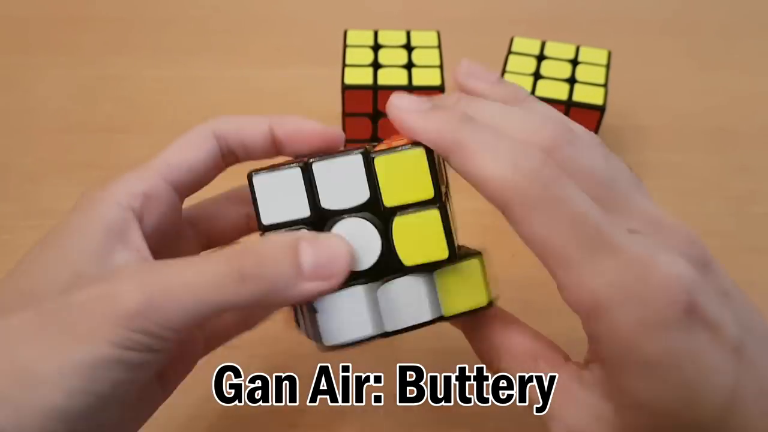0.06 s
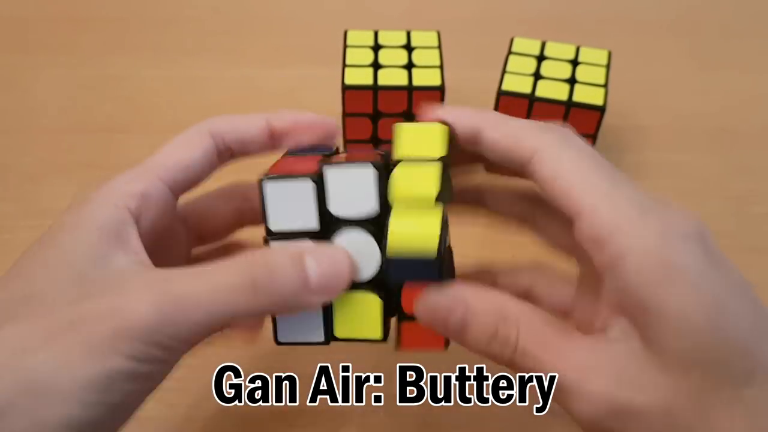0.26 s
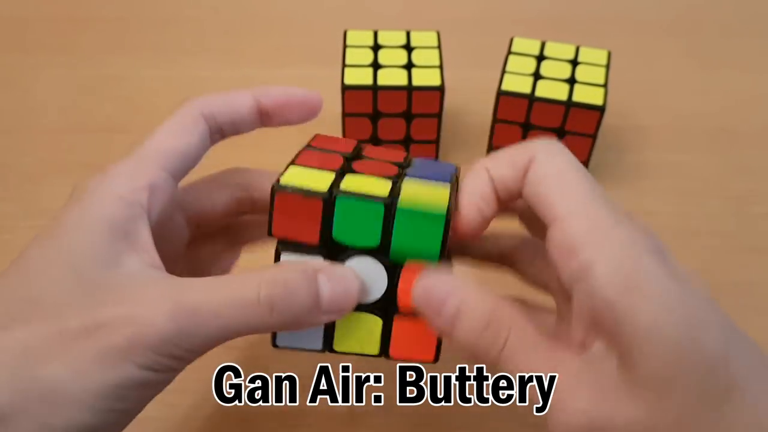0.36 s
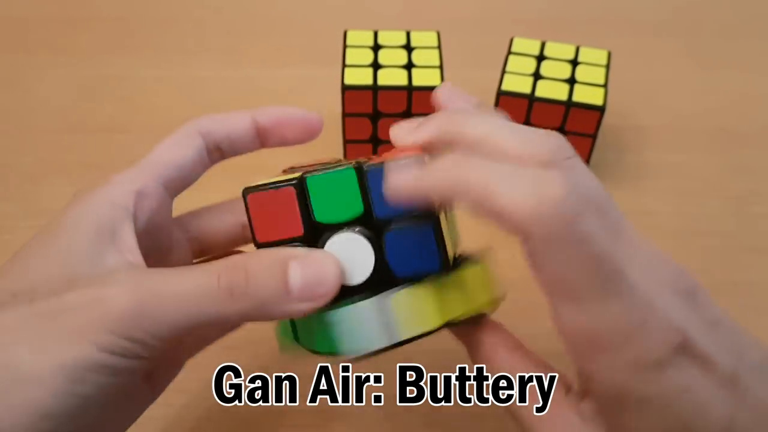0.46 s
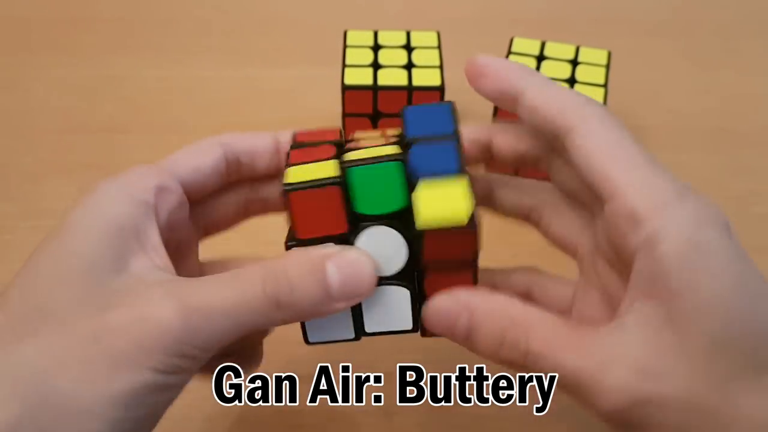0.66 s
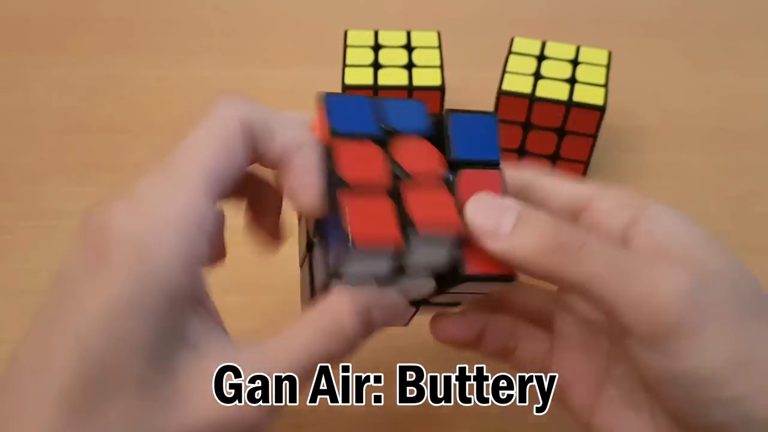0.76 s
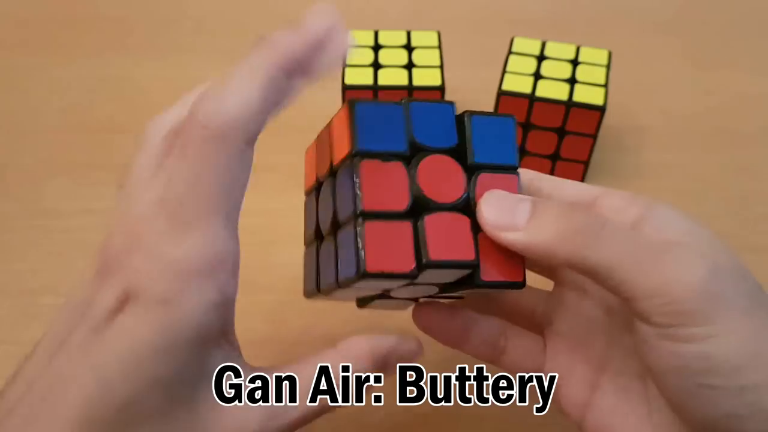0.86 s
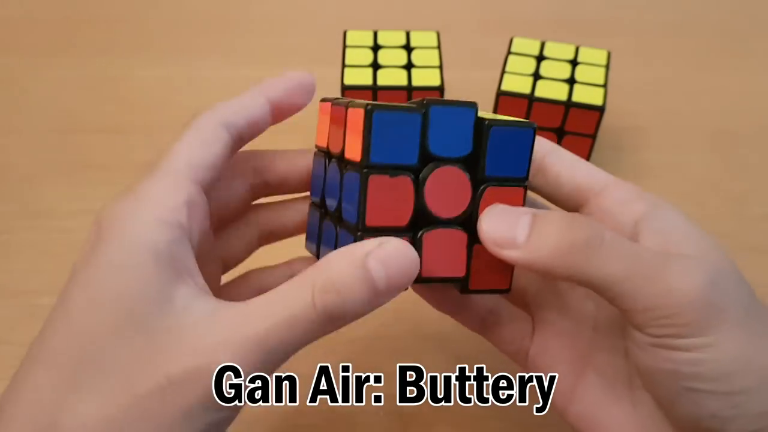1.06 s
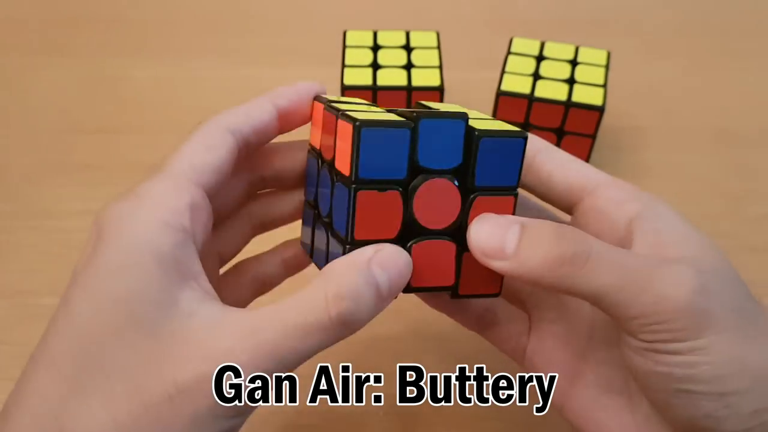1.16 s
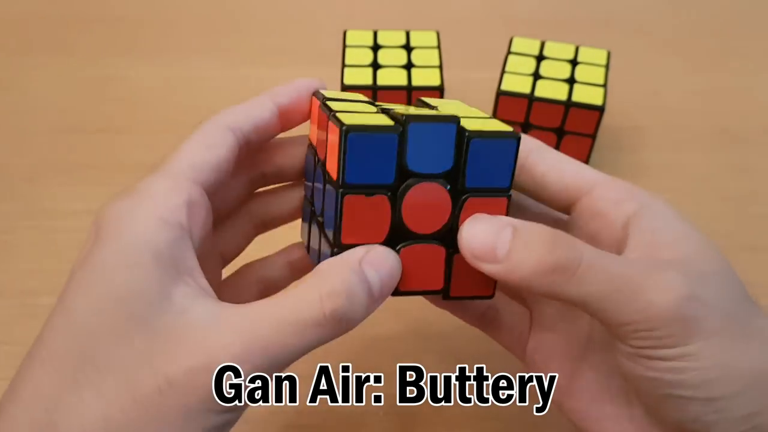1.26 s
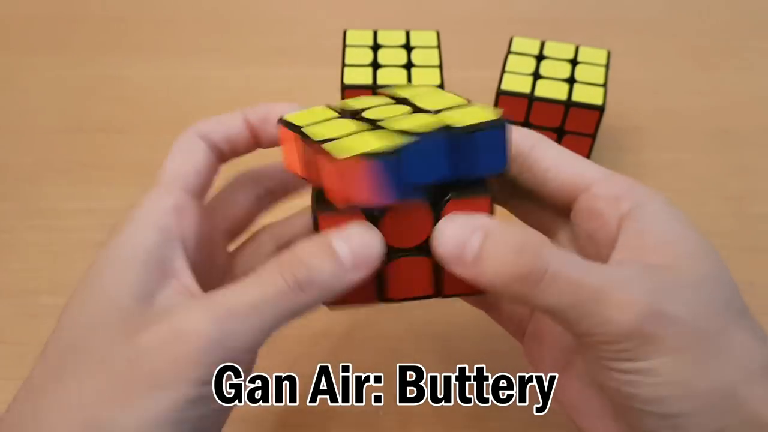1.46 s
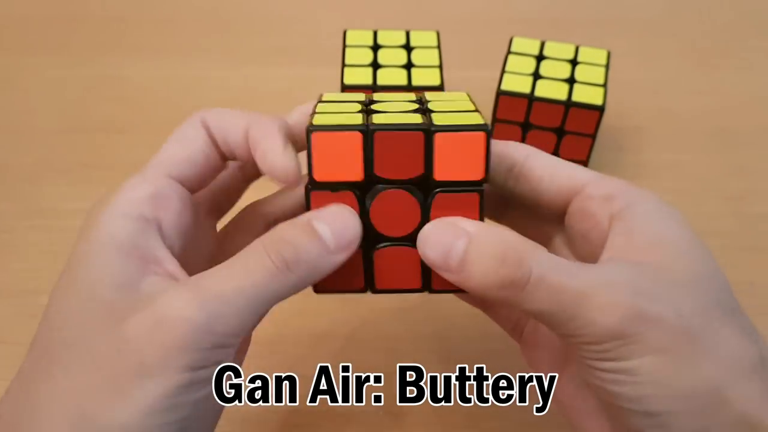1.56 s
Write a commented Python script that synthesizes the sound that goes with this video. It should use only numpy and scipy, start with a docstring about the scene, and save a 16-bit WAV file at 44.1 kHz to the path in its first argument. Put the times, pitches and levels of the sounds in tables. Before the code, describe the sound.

A plastic puzzle cube clicks and rattles as it is twisted quickly by hand.

```python
"""In a small quiet room, a plastic puzzle cube is twisted in quick bursts near two microphones on a desk.
Each clack is a flurry of tiny impacts that make the hollow pieces ring. Between clacks the layers
slide and rattle. The arms make the desk shudder, and the wrists jolt it with low thumps.
The walls add a short echo to the cube, over faint room noise."""
import sys
import numpy as np
from scipy import signal
from scipy.fft import rfft, irfft, next_fast_len
from scipy.io import wavfile

SR = 44100
rng = np.random.default_rng(int(sys.argv[2]) if len(sys.argv) > 2 else 0)


def generate_wav(signal):
    """Clip the signal to [-1, 1] and save it as 16-bit WAV at the path in sys.argv[1]."""
    frames = np.transpose(np.atleast_2d(signal))
    scaled = np.clip(frames, -1, 1) * 32767
    pcm = np.round(scaled).astype(np.int16)
    wavfile.write(sys.argv[1], SR, pcm)


N = 70560  # 1.6 seconds

# The tone of the room noise. Each row: frequency in Hz, relative level in dB.
NOISE_COLOUR = [(25, -20), (60, -9.5), (160, -6), (250, -15), (400, -11), (800, -21), (2000, -23),
                (6000, -40.5), (10000, -43), (14000, -29), (16000, -34)]
# How alike the room noise is left and right. Each row: frequency in Hz, likeness from 0 to 1 (the same).
NOISE_ALIKE = [(60, 0.4), (300, 0.73), (3000, 0.7)]
# The arms shaking the desk. Each row: time in seconds, low rumble in dB, upper rumble in dB.
DESK_SHUDDER = [(0.0, -61, -63.5), (0.098, -71, -64.5), (0.12, -63, -58), (0.212, -60, -102),
                (0.258, -51, -44.5), (0.378, -56.5, -63), (0.422, -60, -59), (0.566, -59, -53.5),
                (0.618, -60.5, -70.5), (0.65, -65, -52), (0.68, -57, -63), (0.712, -51.5, -49),
                (0.832, -63.5, -65), (0.886, -47, -53.5), (0.93, -54.5, -72.5), (0.952, -64, -55.5),
                (1.34, -88.5, -77.5), (1.6, -77, -90)]
# The wrists jolting the desk. Each row: start in seconds, pitch in Hz, level in dB, seconds to fade 60 dB.
WRIST_JOLTS = [(0.119, 122, -52, 0.14), (0.25, 85, -41.5, 0.11), (0.248, 205.3, -41.5, 0.21),
               (0.306, 80, -49, .4), (0.545, 101, -54, 0.14), (0.643, 135.5, -44, 0.13),
               (.665, 68.4, -47.5, 0.27), (0.701, 215, -52, 0.29), (0.74, 100, -48, 0.14),
               (0.87, 69, -49.5, 0.31), (1.194, 90, -63.5, .12)]
# How long the echo lasts in six bands. Each row: a frequency inside the band in Hz, seconds to fade 60 dB.
ECHO_FADES = [(300, 0.22), (1000, 0.39), (2000, 0.35), (5000, 0.34), (8000, 0.32), (12000, .25)]
# The tone of the echo. Each row: frequency in Hz, relative level in dB.
ECHO_COLOUR = [(300, -2.5), (1000, 1), (1900, -1), (4000, 3), (7000, 1), (12000, 4.5)]
# How alike the echo is left and right. Each row: frequency in Hz, likeness from 0 to 1.
ECHO_ALIKE = [(300, 0.6), (900, 0.05), (1800, 0.05), (3000, 0.2), (6000, 0.05)]
# The turns of the cube's layers. Each row: start in seconds, end in seconds, level in dB.
LAYER_TURNS = [(0, 0.094, -61), (.112, 0.17, -52.5), (0.179, 0.223, -50.5), (0.229, .238, -42.5),
               (0.2372, .33, -34), (0.381, .615, -39.5), (0.6295, .735, -36), (.75, 0.79, -51.5),
               (0.804, .855, -45), (0.8586, .918, -28), (1.529, 1.6, -70)]
# The tone of rubbing plastic. Each row: frequency in Hz, relative level in dB.
RUB_COLOUR = [(120, -51.5), (200, -23), (509, -17.5), (916, -12.5), (1450, -8.5), (1810, -5.5), (3310, -12),
              (6880, -17.5), (9930, -25.5), (14600, -17.5), (16000, -26.5)]
# The cube's clacks. Each row: start in seconds, length in milliseconds, hollow pitch in Hz,
# shell pitch in Hz, then the levels in dB of the hollow ring, the knock, the shell and the tick.
CUBE_CLACKS = [(0.0115, 3.7, 1610, 5700, -52.5, -56.5, -58, -56.5),
               (0.0303, 1.8, 2300, 5600, -70, -50.5, -61, -63.5),
               (0.0414, 1.1, 1840, 6800, -52, -55, -49.5, -77),
               (0.0447, 3.2, 2290, 6100, -46, -50.5, -52, -48),
               (0.0652, 1.8, 2230, 6700, -34, -46, -41, -41),
               (0.0808, 5.2, 2020, 5800, -54, -54.5, -60, -57.5),
               (0.123, 1.15, 1990, 5800, -40, -78, -47, -44.5),
               (0.1258, 2.7, 1800, 5100, -59, -49, -55, -59),
               (0.1867, 0.52, 1900, 4386, -32.5, -41, -33, -34.5),
               (0.2234, 3.6, 2040, 4500, -40.5, -50, -43, -42),
               (0.2419, 5.6, 1875, 6900, -18.5, -29, -22, -23),
               (0.2552, 4.3, 1800, 5400, -22, -29.5, -17.5, -19),
               (0.2648, 7, 1840, 6400, -29, -51, -31, -34), (0.2775, 1.7, 1800, 5500, -35, -54, -41, -42),
               (0.2923, 5.9, 1776, 5800, -20, -29.5, -22, -22.5),
               (0.3066, 6.5, 1710, 6500, -25.5, -36, -29.5, -50),
               (0.325, 3.3, 1760, 5500, -34.5, -47, -54, -56.5), (0.385, 2, 1920, 5000, -46, -55, -51, -50),
               (0.3997, 2.1, 1980, 4400, -34, -50, -32.5, -38.5),
               (0.4162, 3, 1900, 5400, -43.5, -49, -43, -44),
               (0.4273, 3.1, 1910, 6200, -35, -46, -38, -35.5),
               (0.4406, 1.9, 2210, 5100, -34, -42, -35, -35),
               (0.4434, 2.7, 2060, 4500, -30.5, -45, -32.5, -36.5),
               (0.4505, 1.65, 2300, 4600, -24, -35, -32.5, -31.5),
               (0.4566, 4.5, 1670, 6600, -29, -45, -29.5, -44.5),
               (0.4628, 2.8, 2280, 7000, -26, -37, -23.5, -24.5),
               (0.4727, 12, 1780, 4800, -40, -54, -41.5, -39.5),
               (0.498, 5.8, 1760, 5700, -28.5, -42, -33.5, -38),
               (0.5058, 3.24, 2440, 6800, -25.5, -28.5, -25, -26.5),
               (0.5277, 5.3, 1490, 6100, -40.5, -48, -47, -44.5),
               (0.5436, 0.78, 2250, 6600, -30.5, -53, -43.5, -48.5),
               (0.5495, 4.8, 2270, 4400, -30, -37.5, -30.5, -30),
               (0.5659, 2.9, 1640, 5100, -31, -45.5, -37.5, -43),
               (0.5835, 2, 2210, 4500, -33.5, -49.5, -38, -51.5),
               (0.595, 1.8, 1710, 5600, -31, -44, -32.5, -46),
               (0.6054, 3.1, 1700, 4500, -36.5, -49.5, -47.5, -51),
               (0.633, 5.9, 1860, 4400, -27, -33, -28.5, -26.5),
               (0.6425, 14, 1943, 5900, -28.5, -33, -26.5, -25),
               (0.6517, 2.9, 1950, 5700, -20, -30.5, -14.5, -17.5),
               (0.6632, 12, 1730, 6400, -31, -43, -28.5, -33.5),
               (0.6924, 3.3, 2000, 7200, -38.5, -52.5, -26.5, -32.5),
               (0.704, 6.6, 1730, 5100, -31, -32, -28.5, -28.5),
               (0.7109, 1.7, 2200, 4300, -25.5, -40, -26.5, -28),
               (0.7163, 1.43, 1380, 7000, -25, -45, -24.5, -33.5),
               (0.755, 2.3, 2140, 5600, -36.5, -51, -49.5, -45.5),
               (0.8103, 8.6, 1840, 5700, -48.5, -53, -53, -56),
               (0.8433, 1.2, 2000, 4600, -35, -53.5, -44.5, -51.5),
               (0.849, 3.6, 1880, 5300, -39.5, -48.5, -47, -51),
               (0.8602, 1.7, 2020, 4500, -26, -38.5, -27, -30),
               (0.863, 2.2, 2000, 4800, -28, -45.5, -31, -30),
               (0.8699, 6.6, 2260, 5600, -30, -39.5, -31.5, -42),
               (0.8747, 3.6, 2003, 5700, -14.5, -34, -23.5, -21.5),
               (0.8853, 4.9, 1860, 6300, -27.5, -27, -19.5, -21),
               (0.8911, 3.2, 1920, 7000, -21, -41, -17.5, -20),
               (0.897, 6.7, 1830, 6600, -20.5, -30.5, -18, -19.5),
               (0.9085, 4.5, 1860, 5100, -22.5, -42.5, -29, -28.5),
               (0.9265, 1.6, 1800, 5500, -28, -44, -35, -38.5),
               (0.938, 2.1, 1800, 5500, -35.5, -51, -47.5, -48.5),
               (1.193, 3.2, 2176, 6810, -59.5, -75.5, -62, -66.5),
               (1.2445, 2.6, 1364, 6800, -58, -56.5, -73.5, -72),
               (1.2992, 1.9, 2130, 6300, -62.5, -80.5, -63.5, -65.5),
               (1.331, 1.5, 2100, 4000, -66.5, -79, -65.5, -67),
               (1.5269, 1.86, 1645, 6900, -56, -49, -48.5, -63.5),
               (1.5368, 3.8, 1480, 6300, -59.5, -64, -64, -74),
               (1.5438, 1.4, 1970, 7600, -69.5, -71.5, -53, -47),
               (1.5545, 1.6, 2190, 6600, -55, -72.5, -55.5, -61),
               (1.559, 1.6, 2290, 6500, -68, -81, -58, -68),
               (1.5712, 1.8, 1540, 7200, -48.5, -60, -58, -61.5),
               (1.5794, 1.8, 1590, 5800, -43, -76, -70, -73),
               (1.5879, 3.5, 1960, 6700, -50, -50.5, -48, -47),
               (1.5928, 2.2, 1800, 5700, -50, -45, -48, -55)]
# Where the cube is heard. Each row: frequency in Hz, how much louder the left is than the right in dB.
CUBE_BALANCE = [(300, -1.6), (1500, 1.5), (3000, 1), (6000, 1.5), (10000, 0.4)]
# The tone of the microphones. Each row: frequency in Hz, boost or cut in dB.
MIC_TONE = [(35, 1.5), (50, -5.5), (62, -3.5), (650, -6), (1000, -2), (1400, -0.5), (1850, -3.5), (3300, 1),
            (7000, 1.5), (8300, 4.5), (9900, 1.5), (13000, -3.3)]

CORE_HZ, CORE_WIDTH_HZ = 1830, 110  # one narrow ring of the whole cube
KNOCK_HZ, KNOCK_WIDTH_HZ = 942, 856
HOLLOW_ALIKE, KNOCK_ALIKE, SHELL_ALIKE = 0.84, 0.84, 0.08  # left-right likeness from 0 to 1
FFT_SIZE = next_fast_len(N + 4096)  # spare room, so filtering does not wrap the end onto the start


def gain(db):
    """Turn decibels into a number to multiply by."""
    return 10 ** (np.asarray(db, float) / 20)


def look_up(table, hz):
    """Read between the rows of a (Hz, value) table, giving each octave equal space."""
    table = np.array(table, float)
    return np.interp(np.log(np.maximum(hz, 1)), np.log(table[:, 0]), table[:, 1])


def ring(x, hz, width_hz):
    """Let a sound ring at one pitch; a narrower width rings longer."""
    hz = min(hz, 0.4 * SR)
    return signal.lfilter(*signal.iirpeak(hz, hz / max(width_hz, 1), fs=SR), x)


def focused_ring(x, hz, width_hz):
    """Ring a second time, twice as wide, to let less through far from the pitch."""
    return ring(ring(x, hz, width_hz), hz, 2 * width_hz)


def stereo(noise, alike):
    """Make left and right from two noises: one shared, one added left and subtracted right."""
    alike = np.clip(alike, 0, 1)
    shared = noise[0] * np.sqrt((1 + alike) / 2)
    opposed = noise[1] * np.sqrt((1 - alike) / 2)
    return np.array([shared + opposed, shared - opposed])


def coloured(noise, colour, alike):
    """Give two noises a tone and a left-right likeness, at an average strength of 1."""
    hz = np.fft.rfftfreq(noise.shape[1], 1 / SR)
    spectrum = stereo(rfft(noise), look_up(alike, hz)) * gain(look_up(colour, hz))
    out = irfft(spectrum, noise.shape[1])
    return out / np.sqrt(np.mean(out ** 2))


def impacts(samples, per_second, fade_ms, scatter_db):
    """The loudness over time of tiny random hits, uneven in size and quick to fade."""
    timing, size = rng.random((2, samples))
    hits = (timing < per_second / SR) * gain(-scatter_db * np.log(size * 0.95 + 0.05))
    return signal.lfilter([1], [1, -np.exp(-1000 / (fade_ms * SR))], hits)


def room_noise():
    """The faint, steady rumble and hiss of the room."""
    return coloured(rng.standard_normal((2, N)), NOISE_COLOUR, NOISE_ALIKE) * gain(-64.5)


def desk_shudder(t):
    """Moving arms shake the desk, which rumbles around two low pitches."""
    times, low_db, upper_db = np.array(DESK_SHUDDER).T
    out = 0
    for hz, width_hz, db in ((80, 80, low_db), (165, 390, upper_db)):
        arms = stereo(rng.standard_normal((2, N)), alike=0.7)
        shake = ring(ring(arms, hz, width_hz), hz, width_hz)
        out = out + shake / shake.std() * gain(np.interp(t, times, db))
    return out


def desk_thumps(t):
    """Each jolt of the wrists makes the desk top ring briefly on one low note."""
    rise_ms, out = 2.9, 0
    for start, hz, db, fade_s in WRIST_JOLTS:
        age = np.maximum(t - start, 0)
        shape = (1 - np.exp(-age * 1000 / rise_ms)) * gain(-60 * age / fade_s)
        out = out + gain(db) * 2 * shape * np.sin(2 * np.pi * hz * age)
    return out


def wall_echo(x):
    """The walls throw back a dense wash of reflections; each band fades at its own speed."""
    t = np.arange(SR // 2) / SR
    spectrum = rfft(coloured(rng.standard_normal((2, len(t))), ECHO_COLOUR, ECHO_ALIKE))
    hz = np.fft.rfftfreq(len(t), 1 / SR)
    edges_hz = [0, 500, 1400, 3000, 6000, 10000, SR]
    rise_ms, tail = 1.6, 0
    for (_, fade_s), low, high in zip(ECHO_FADES, edges_hz, edges_hz[1:]):
        band = irfft(spectrum * ((hz >= low) & (hz < high)), len(t))
        main = gain(-60 * t / fade_s)
        late = gain(-19 - 60 * t / (fade_s * 2.13))  # a weaker, slower part
        tail = tail + band * (main + late)
    tail *= 1 - np.exp(-t * 1000 / rise_ms)
    tail /= np.sqrt(np.sum(tail ** 2) / 2)
    return gain(-7.5) * signal.fftconvolve(x[None], tail, axes=1)[:, :N]


def sliding_layers(t):
    """The layers rub past each other with a grainy rattle that also rings the whole cube."""
    steady, rise_ms, fall_ms = 0.4, 2.5, 5.9
    grains = steady + impacts(N, per_second=600, fade_ms=1.4, scatter_db=2.5)
    turns = 0
    for start, end, db in LAYER_TURNS:
        rise = np.clip((t - start) * 1000 / rise_ms, 0, 1)
        fall = np.exp(-np.maximum(t - end, 0) * 1000 / fall_ms)
        turns = turns + gain(db) * rise * fall
    alike = [(KNOCK_HZ, KNOCK_ALIKE), (1900, HOLLOW_ALIKE), (5000, SHELL_ALIKE)]
    rub = coloured(grains * rng.standard_normal((2, N)), RUB_COLOUR, alike) * turns
    return rub + gain(2) * ring(rub, CORE_HZ, CORE_WIDTH_HZ)


def flurry(ms, length_ms, release_ms):
    """A scrape, a blow, then tiny impacts; given once with a hard blow and once with a soft one."""
    attack_ms, sag_db, steady = 0.12, -5.5, 0.87
    scrape = gain(-9.5) * np.exp(np.minimum(ms, 0) / (0.5 * length_ms))
    rise = np.maximum(np.clip(1 + ms / attack_ms, 0, 1), scrape)
    sag = gain(sag_db * np.clip(ms / length_ms, 0, 1))
    fall = np.exp(-np.maximum(ms - length_ms, 0) / release_ms)
    grains = steady + impacts(len(ms), per_second=4100, fade_ms=0.35, scatter_db=3.5)
    noise = rng.standard_normal((2, len(ms)))
    push = rise * sag * fall * grains * noise
    blow = np.sign(noise[0]) * (ms == 0) * np.array([[1], [0]])  # one spike, shared by both sides
    return push + gain(22.5) * blow, push + gain(8) * blow


def at_level(x, db, length_ms):
    """Give a short stereo sound the energy of a steady one with this level and length."""
    samples = length_ms * SR / 1000
    return x * gain(db) / np.sqrt(np.sum(x ** 2) / 2 / samples)


def clacks():
    """Each flurry rings the hollow pieces and their thin shells, with a dull knock and a high tick."""
    span, lead_in = 2560, 512  # samples in one clack, and how many come before its blow
    ms = (np.arange(span) - lead_in) * 1000 / SR
    shell_band = signal.butter(2, [2700, 8600], "bandpass", fs=SR, output="sos")
    out = np.zeros((2, N + span))
    for start, length_ms, hollow_hz, shell_hz, hollow_db, knock_db, shell_db, tick_db in CUBE_CLACKS:
        release_ms = 0.78 + 0.3 * length_ms  # longer flurries die away more slowly
        total_ms = length_ms + release_ms
        hard, soft = flurry(ms, length_ms, release_ms)
        hollow_push = stereo(hard, HOLLOW_ALIKE)
        knock_push = stereo(hard, KNOCK_ALIKE)
        shell_push = stereo(soft, SHELL_ALIKE)

        hollow = focused_ring(hollow_push, hollow_hz, width_hz=190 + 404 / length_ms)  # short taps: drier
        core = ring(ring(hollow_push, CORE_HZ, CORE_WIDTH_HZ), CORE_HZ, KNOCK_WIDTH_HZ)
        knock = focused_ring(knock_push, KNOCK_HZ, KNOCK_WIDTH_HZ)
        thud = focused_ring(knock_push, hz=335, width_hz=820)  # the soft body of the knock
        shell_ring = focused_ring(shell_push, shell_hz, width_hz=1800)
        shell_hiss = signal.sosfilt(shell_band, shell_push)
        shell = at_level(shell_ring, 0, total_ms) + at_level(shell_hiss, 8, total_ms)
        tick = focused_ring(shell_push, hz=13430, width_hz=8570)

        parts = [(hollow, hollow_db), (core, hollow_db - 9), (knock, knock_db), (thud, knock_db - 9),
                 (shell, shell_db), (tick, tick_db)]
        first = int(start * SR)
        out[:, first:first + span] += sum(at_level(part, db, total_ms) for part, db in parts)
    return out[:, lead_in:lead_in + N]


def scene():
    """The cube and its echo, a little to the left, with the desk and the room noise."""
    t = np.arange(N) / SR
    cube = clacks() + sliding_layers(t)
    echo = (wall_echo(cube[0]) + wall_echo(cube[1])) / np.sqrt(2)
    hz = np.fft.rfftfreq(FFT_SIZE, 1 / SR)
    side, right_lag_us = np.array([[0.5], [-0.5]]), 57.2
    balance = gain(side * look_up(CUBE_BALANCE, hz))
    delay = np.exp(2j * np.pi * hz * side * right_lag_us / 10 ** 6)  # the left hears it first
    placed = irfft(rfft(cube + echo, FFT_SIZE) * balance * delay, FFT_SIZE)[:, :N]
    return placed + room_noise() + desk_shudder(t) + desk_thumps(t)


def record(dry):
    """The microphones thin the bass and lift parts of the treble; the very top is cut off."""
    hz = np.fft.rfftfreq(FFT_SIZE, 1 / SR)
    miked = irfft(rfft(dry, FFT_SIZE) * gain(look_up(MIC_TONE, hz)), FFT_SIZE)[:, :N]
    top_cut = signal.ellip(10, 0.2, 80, 15950, fs=SR, output="sos")  # steep, above 15950 Hz
    return signal.sosfilt(top_cut, miked)


dry = scene()
out = record(dry)
generate_wav(out)
```